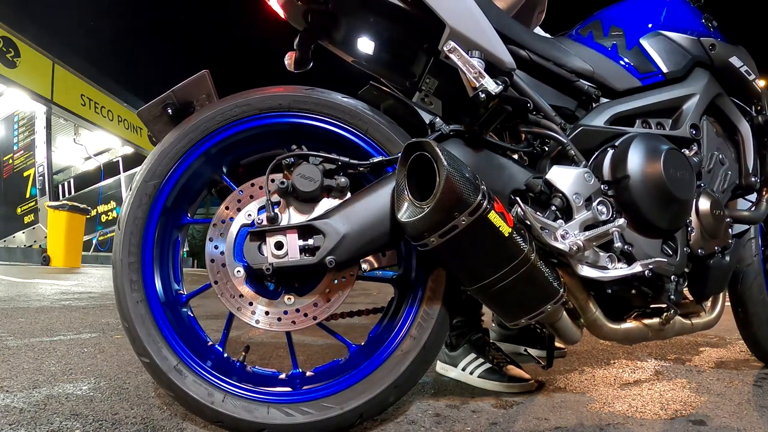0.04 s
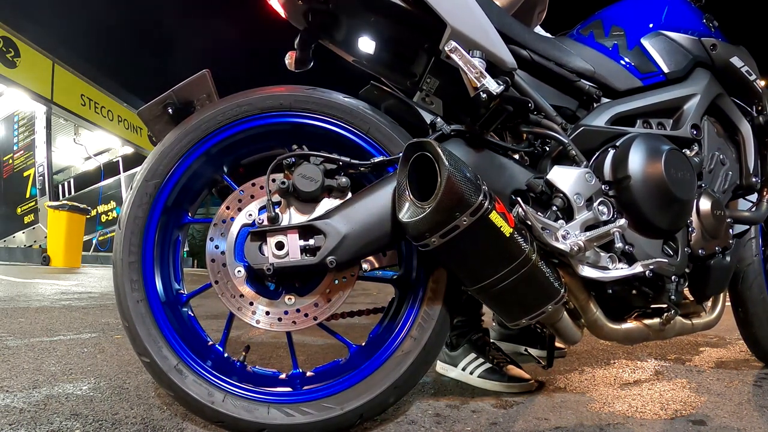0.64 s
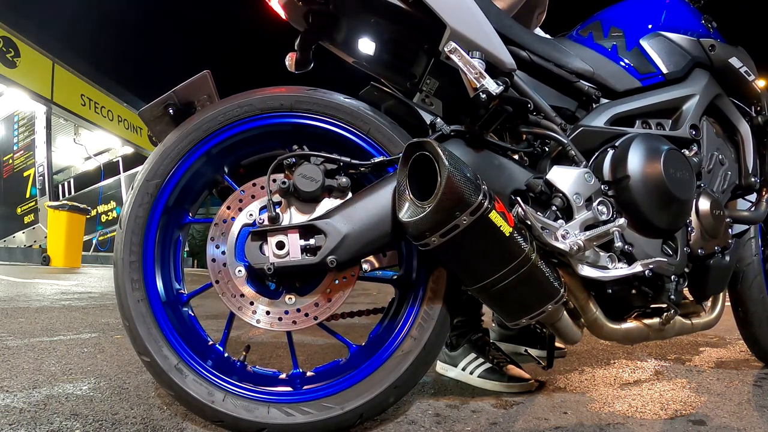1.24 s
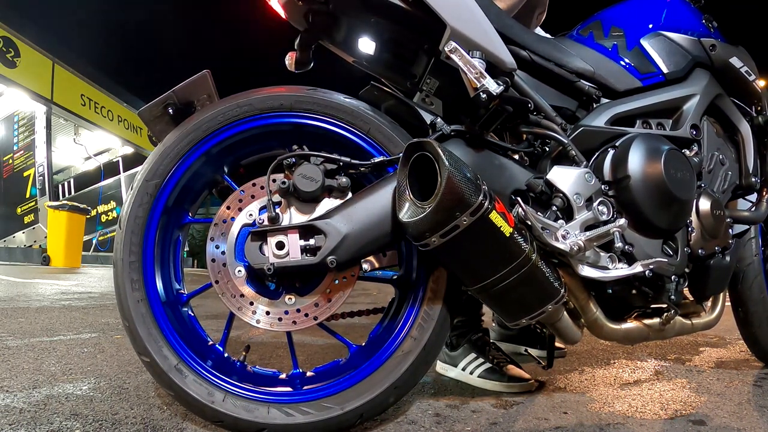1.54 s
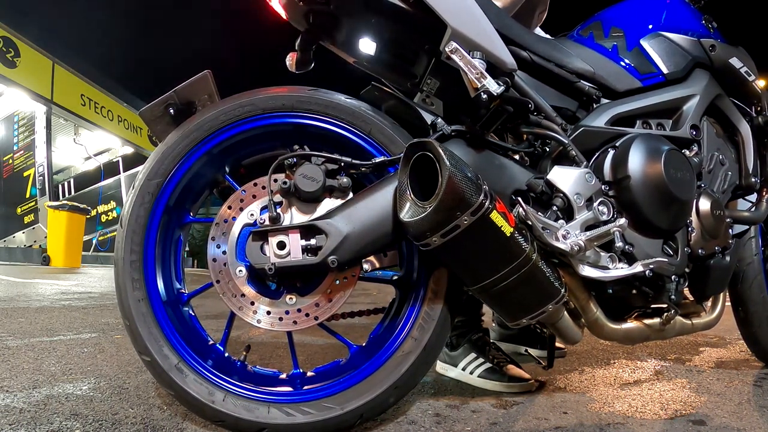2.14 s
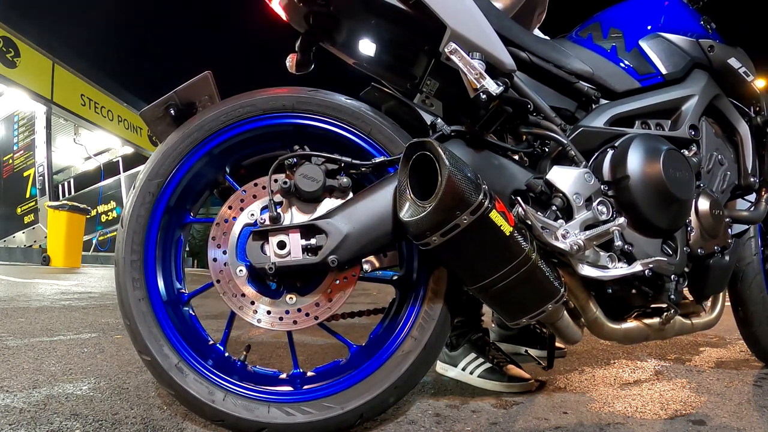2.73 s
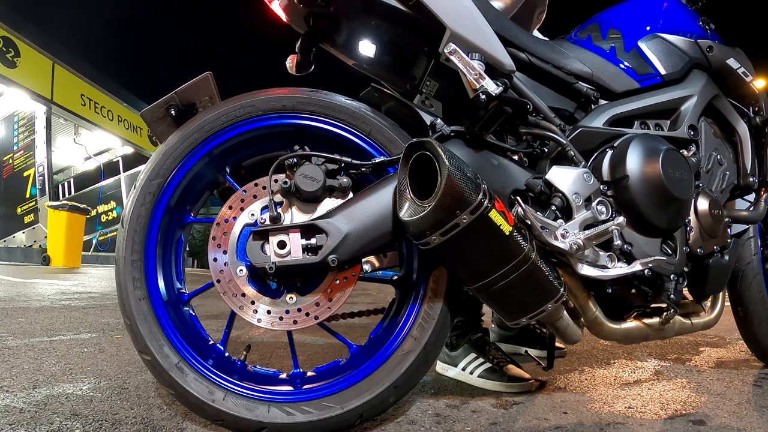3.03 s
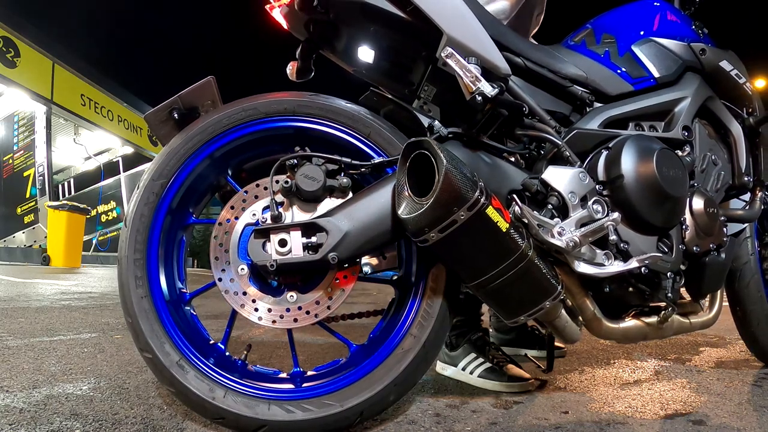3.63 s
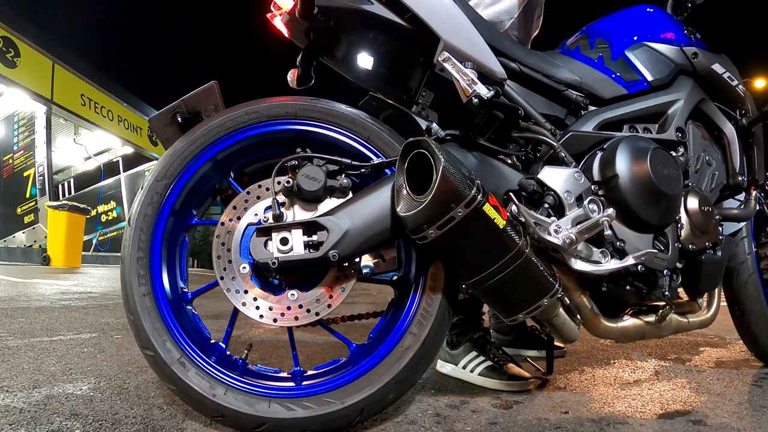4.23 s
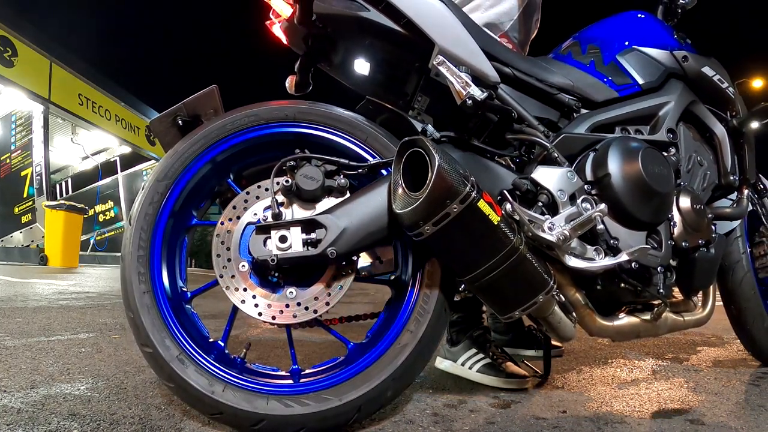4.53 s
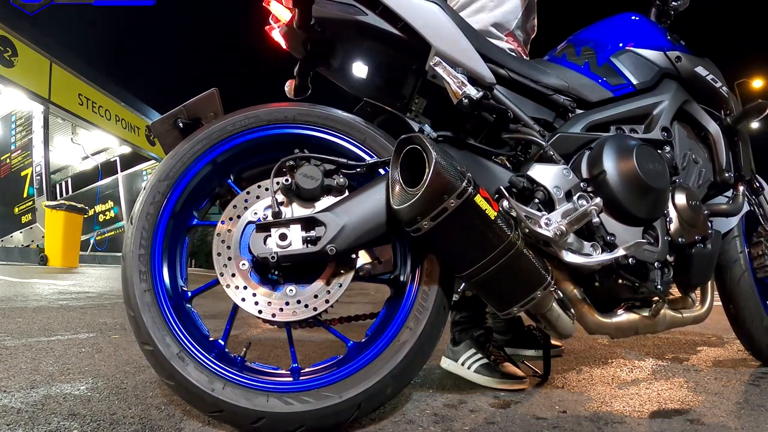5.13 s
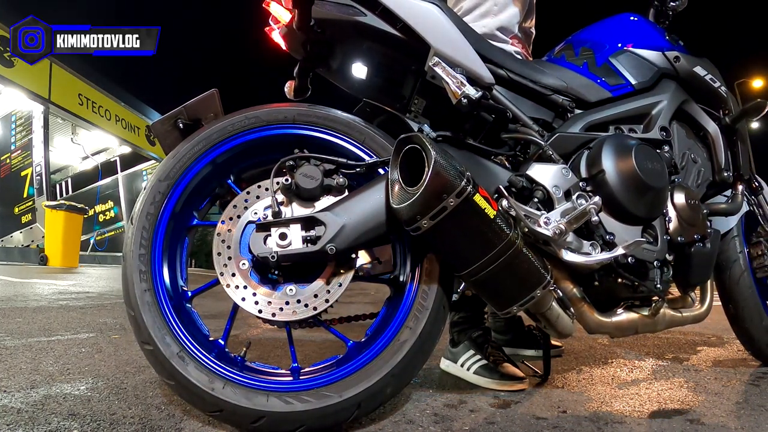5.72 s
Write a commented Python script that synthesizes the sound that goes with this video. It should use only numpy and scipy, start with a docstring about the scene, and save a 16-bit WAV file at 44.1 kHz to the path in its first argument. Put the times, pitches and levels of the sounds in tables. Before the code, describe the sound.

A motorcycle engine is revved twice, heard close behind its silencer outdoors. Each time it stumbles briefly, catches and climbs with a booming rasp, the second rev going higher. As it slows there is a faint hiss, then burbling and scattered exhaust pops. After one short spit it drops into a lumpy idle, with light valve ticking and gear whine underneath.

```python
"""Two revs of a motorcycle

A three-cylinder motorcycle is revved twice, heard close behind its silencer, then idles lumpily.
Each exhaust stroke sends a pulse down the pipe: a boom and, with open throttle, a rasping crack.
In each rev the engine stumbles, catches and pulls; then drag slows it, hissing, later burbling.
Valves rustle, gears whine, unburnt fuel pops, hot gas snaps out, and one spit comes before the idle."""
import sys
import numpy as np
from scipy import signal
from scipy.fft import rfft, irfft, next_fast_len
from scipy.io import wavfile
from scipy.ndimage import uniform_filter1d, minimum_filter1d, map_coordinates

SR = 44100
rng = np.random.default_rng(int(sys.argv[2]) if len(sys.argv) > 2 else 0)


def generate_wav(sig):
    """Save sig (samples, or channels by samples) to the path in sys.argv[1] as 16-bit PCM at SR."""
    pcm = np.round(np.clip(np.atleast_2d(sig).T, -1, 1) * 32767).astype(np.int16)
    wavfile.write(sys.argv[1], SR, pcm)


N = 258867
TIME = np.arange(N) / SR
FFT_SIZE = next_fast_len(N + SR // 2, True)
HZ = np.fft.rfftfreq(FFT_SIZE, 1 / SR)
OPEN_S, SHUT_S = 0.065, 0.019  # time the throttle takes to open and to shut
BURBLE_BELOW_HZ = 121  # a coasting engine runs raggedly below this many strokes a second


def amp(db):
    """Turns decibels into a gain."""
    return 10 ** (np.asarray(db) / 20)


def unit(x):
    """Scales x to an average strength (rms) of 1."""
    return x / np.sqrt(np.mean(x ** 2) + 1e-20)


def ramp(start, end):
    """Rises from 0 to 1 between two times."""
    return np.clip((TIME - start) / max(end - start, 1 / SR), 0, 1)


def over_pitch(points):
    """Joins (pitch_hz, value) points into a curve over all frequencies."""
    pitch_hz, values = np.transpose(points)
    return np.interp(np.log(HZ + 1), np.log(pitch_hz + 1), values)


def curves(rows, at=TIME):
    """Looks up `at` in a table's first column and gives a curve for each other column."""
    first, *others = np.transpose(rows)
    return np.array([np.interp(at, first, column) for column in others])


def wobble(per_s):
    """A smooth random curve through per_s points a second."""
    return map_coordinates(rng.standard_normal(int(N * per_s / SR) + 4), [TIME * per_s])


def filtered(x, response):
    """Passes x through a filter, given as a gain for each frequency."""
    return irfft(rfft(x, FFT_SIZE) * response, FFT_SIZE)[..., :N]


def body(colour, rings=()):
    """A filter with a broad tone colour and narrow ringing peaks on top."""
    peaks_db = sum(lift / (1 + (2 * (HZ - pitch) / width) ** 2) for pitch, width, lift in rings)
    cepstrum = irfft(np.log(amp(over_pitch(colour) + peaks_db)), FFT_SIZE)
    # folding this in half makes the ringing come after a hit, never before
    cepstrum[1:FFT_SIZE // 2] *= 2
    cepstrum[FFT_SIZE // 2 + 1:] = 0
    return np.exp(rfft(cepstrum))


def less_bass(response, below_hz=210):
    """Thins a filter's low end, as sharp pulses carry little bass."""
    return response * 1j * HZ / (below_hz + 1j * HZ)


def pulses(times, sizes=1):
    """Single clicks at exact times, even between samples."""
    at = np.asarray(times)[:, None] * SR
    taps = np.floor(at).astype(int) + np.arange(-7, 9)
    clicks = np.sinc(taps - at) * np.sinc((taps - at) / 8) * np.reshape(sizes, (-1, 1))
    return np.bincount(np.clip(taps, 0, N).ravel(), clicks.ravel(), N + 1)[:N]


def fading(clicks, life_s):
    """Gives each click a tail that dies away."""
    return np.abs(signal.lfilter([1], [1, -np.exp(-1 / (life_s * SR))], clicks))


def cycle_strength(x, phase):
    """Strength (rms) of x over the three strokes around each moment."""
    energy = np.cumsum(x ** 2)
    early, late = (np.interp(phase + step, phase, np.arange(N)).astype(int) for step in (-1.5, 1.5))
    return np.sqrt((energy[late] - energy[early]) / (late - early) + 1e-20)


# How alike left and right are (1 is identical): pitch_hz, likeness
STEREO_LIKENESS = [(700, 0.91), (2000, 0.65), (6000, 0.043)]
def stereo_noise(response):
    """Coloured noise whose two sides are less alike in the treble."""
    angle = np.arccos(over_pitch(STEREO_LIKENESS)) / 2
    shares = np.array([np.cos(angle), np.sin(angle)])
    middle, side = filtered(rng.standard_normal((2, N)), response * shares)
    return unit(np.array([middle + side, middle - side]))


# Engine speed during each rev, one list per rev: time_s, strokes_per_s
REV_SPEEDS = [
    [(.11, 61), (.16, 70), (.21, 113), (.305, 124), (.376, 188.4), (.422, 225), (.472, 243.5),
     (.516, 235.4)],
    [(1.41, 56), (1.45, 70), (1.51, 108), (1.66, 108), (1.725, 128), (1.852, 245.5), (1.92, 284),
     (1.96, 296.5)],
]
# The idle's wandering speed: time_s, strokes_per_s
IDLE_SPEEDS = [(3.1, 44.5), (3.323, 29.5), (3.495, 37.2), (3.99, 35.25), (4.43, 37.15), (4.62, 33.6),
               (4.9, 39.1), (4.93, 36), (5.6, 36.85)]
IDLE_START_S, SETTLE_S = IDLE_SPEEDS[0][0], 0.64
def engine_speed(start_hz=73.15, drag_per_s=1.41, friction_hz=17):
    """Strokes per second: drag slows the engine around each rev, until the idle takes over."""
    def coast(from_s, from_hz):
        return (from_hz + friction_hz) * np.exp(-drag_per_s * (TIME - from_s)) - friction_hz
    rate = coast(0, start_hz)
    for rev in REV_SPEEDS:
        rate = np.select([TIME < rev[0][0], TIME < rev[-1][0]], [rate, curves(rev)[0]], coast(*rev[-1]))
    return np.where(TIME < IDLE_START_S, rate, curves(IDLE_SPEEDS)[0])


# The first steady stroke of each rev and of the idle: time_s
FIRST_STROKES = [.302, 1.689, 3.104]
def stroke_phase(rate):
    """A running count of strokes, nudged to be a whole number at each first steady stroke."""
    phase = np.cumsum(rate) / SR
    counts = np.interp(FIRST_STROKES, TIME, phase)
    offsets = counts - counts[-1]
    return phase - counts[-1] - np.interp(TIME, FIRST_STROKES, offsets - np.round(offsets))


# The rider's twists of the throttle: open_s, ease_off_s, shut_s
THROTTLE_TWISTS = [(0.087, 0.403, 0.506), (1.39, 1.934, 2.004)]
def engine_state():
    """How much (0 to 1) the engine is on the throttle, coasting and idling."""
    twists = sum(ramp(opens, opens + OPEN_S) - ramp(shuts, shuts + SHUT_S)
                 for opens, _, shuts in THROTTLE_TWISTS)
    throttle = np.clip(twists, 0, 1)
    idling = ramp(IDLE_START_S - OPEN_S / 2, IDLE_START_S)
    return throttle, (1 - throttle) * (1 - idling), idling


def easing():
    """Rises from 0 to 1 as the rider eases off at the end of each rev."""
    return sum(ramp(eases, shuts) * (TIME < shuts + SHUT_S) for _, eases, shuts in THROTTLE_TWISTS)


# Exhaust loudness with the throttle open: strokes_per_s, boom_db, rasp_db
OPEN_LEVELS = [(62.3, -12.5, -39), (88.4, -13.5, -25.5), (146, -10.5, -20.5), (192, -13.5, -21.5),
               (276, -11, -18.5)]
# Exhaust loudness while coasting: strokes_per_s, boom_db, rasp_db
COAST_LEVELS = [(49.5, -19, -69), (108, -16, -45.5), (137, -11.5, -38), (179, -12, -33.5),
                (192.7, -10.5, -24), (228, -11, -24), (278, -15.5, -20)]
def exhaust_levels(rate, idle_boom_db=-16, idle_rasp_db=-67, unsettled_db=2.5, ease_drop_db=(6.5, 5.5)):
    """Boom and rasp levels follow speed and throttle; the idle booms less until it settles."""
    throttle, coasting, idling = engine_state()
    pulling_db = curves(OPEN_LEVELS, rate) - np.outer(ease_drop_db, easing())
    boom_db, rasp_db = throttle * pulling_db + coasting * curves(COAST_LEVELS, rate)
    unsettled = 1 - ramp(IDLE_START_S, IDLE_START_S + SETTLE_S)
    boom_db += idling * (idle_boom_db - unsettled_db * unsettled)
    return boom_db, rasp_db + idling * idle_rasp_db


# Firing stops as the engine stumbles or the fuel is cut: start_s, end_s
FIRING_GAPS = [(.223, .298), (.498, .511), (1.523, 1.685), (1.932, 1.970), (2.003, 2.014)]
# Missed beats of the idle: time_s, drop_db
MISSED_BEATS = [(3.178, 12.5), (3.232, 4), (3.292, 21), (4.469, 27.5), (4.582, 19), (4.698, 14),
                (4.81, 5.5), (4.94, 9), (5.435, 10)]
def strokes(rate, phase, imbalance=0.028, dead_db=-11, weak_db=-5, weak_share=.25):
    """Times and sizes of the strokes: even under load, ragged when coasting slowly, weak in the gaps."""
    stroke = np.arange(int(phase[0]), int(phase[-1]))
    time_luck, size_luck = rng.standard_normal((len(stroke), 2)).T
    cylinder = stroke % 3 - 1
    throttle, coasting, idling = (np.interp(stroke, phase, share) for share in engine_state())
    burbling = coasting * (np.interp(stroke, phase, rate) < BURBLE_BELOW_HZ)
    jitter_strokes = .005 + .007 * idling + .06 * burbling
    times = np.interp(stroke + jitter_strokes * time_luck + .005 * cylinder, phase, TIME)
    weak = rng.random(len(times)) < weak_share * burbling
    scatter_db = .41 + 2 * burbling + .6 * throttle
    level_db = weak_db * weak + scatter_db * size_luck
    for start_s, end_s in FIRING_GAPS:
        level_db[(times > start_s) & (times < end_s)] = dead_db
    for time_s, drop_db in MISSED_BEATS:
        level_db[np.argmin(np.abs(times - time_s))] -= drop_db
    return times, (1 + imbalance * cylinder) * amp(level_db)


def piston_swell(rate, phase, slow, pumping_hz=101, lurch_db=3, lag_strokes=.25, wander_strokes=.16):
    """Coasting pistons pump a round wave that grows, lurches and wanders as the engine slows."""
    lurch = amp(lurch_db * slow * wobble(35))
    wave = np.cos(2 * np.pi * (phase - lag_strokes + wander_strokes * slow * wobble(35)))
    return (pumping_hz / rate) ** 3 * 2 * rate / SR * lurch * wave


def gas_slosh(rate, times, sizes, push, pitch_hz=46):
    """A weak burn lets gas slosh back in the silencer, more so when strokes are far apart."""
    shortfall = np.maximum(.8 - sizes, 0)
    spacing = np.minimum(1, 70 / np.interp(times, TIME, rate))
    resonance = 1j * HZ * pitch_hz / (pitch_hz ** 2 - HZ ** 2 + 1j * HZ * pitch_hz)
    return filtered(push * pulses(times, shortfall * spacing), resonance ** 2)


# Tone colour of the silencer: pitch_hz, level_db
SILENCER_COLOUR = [(10, -68.5), (36, 5), (58, 11), (135, 9), (190, 11), (250, 1.5), (335, 6), (395, -18),
                   (455, -30.5), (520, -25.5), (700, -44), (3000, -110)]
def pipe(round_trip_s=0.007928, echo=0.6):
    """A pulse runs up and down the pipe and leaves through the silencer."""
    return body(SILENCER_COLOUR) / (1 - echo * np.exp(-2j * np.pi * HZ * round_trip_s))


# Lone firings while the engine stumbles: time_s, level_db (against a normal stroke), sharpness (0 to 1)
STUMBLE_BANGS = [(0.236, 0, 0.15), (.269, 1, 0.5), (.286, 1.5, 0.95), (1.533, -3.5, 0), (1.570, -0.5, 0.07),
                 (1.607, -2.5, 0), (1.635, 0.5, 0.38), (1.654, -2, 0.17), (1.672, 0, .08), (1.681, -5, .15)]
def exhaust_boom(rate, phase, times, sizes, boom_db, unfired_db=-2.5, slosh_db=1, tumble_db=-8):
    """Each stroke booms through the pipe, with less bass under load."""
    throttle, coasting, _ = engine_state()
    bang_s, bang_db, _ = np.transpose(STUMBLE_BANGS)
    slow = uniform_filter1d(1. * (rate < BURBLE_BELOW_HZ), size=900)
    swell = coasting * piston_swell(rate, phase, slow)
    push = amp(unfired_db * coasting * slow)  # unfired strokes push only weakly
    full = pipe()
    thin = less_bass(full)
    def thump(clicks):
        return filtered((1 - throttle) * clicks, full) + filtered(throttle * clicks, thin)
    boom = thump(push * pulses(times, sizes) + pulses(bang_s, amp(bang_db)) + swell)
    boom += amp(slosh_db) * np.abs(full).max() * gas_slosh(rate, times, sizes, push)
    # scaled against even strokes, so misses and bangs still stand out
    boom /= cycle_strength(thump(push * pulses(times) + swell), phase)
    # coasting slowly, gas tumbles in the pipe between the strokes
    tumble = coasting * slow * unit(filtered(rng.standard_normal(N), thin))
    return amp(boom_db) * (boom + amp(tumble_db) * tumble)


def shock_fronts(clicks, gas, turbulence, puff_s):
    """Sharp fronts, each trailed by a puff of swirling gas that swells and dies."""
    puffs = fading(fading(clicks, puff_s / 2), puff_s / 2)
    return clicks + turbulence * puffs * gas * 2 / np.sqrt(puff_s * SR / 2) ** 3


# Tone colour of the cracks with the throttle open, and with it shut: pitch_hz, level_db
BRIGHT_CRACK = [(200, -15.5), (480, 4), (1200, -1.5), (1480, -0.5), (3100, -6.5), (3700, -15),
                (6000, -27.5), (16000, -57.5)]
DULL_CRACK = [(200, -11), (480, 2.5), (1200, -6.5), (1480, -10.5), (3100, -18.5), (7000, -48), (16000, -54)]
# Ringing of the silencer's can: pitch_hz, width_hz, lift_db
CAN_RINGS = [(555, 36, 6.5), (1115, 150, 7), (1934, 360, 10), (2850, 280, 6), (3190, 110, 7),
             (4160, 270, 12), (5160, 380, 7), (6240, 340, 5.5)]
def exhaust_rasp(rate, phase, times, sizes, blunt_hz=1080, rebound=.3, rebound_s=.0009, steady_hz=220):
    """Pulses steepen into cracks in the can: blunt at low speed, bright under load, dull when coasting."""
    throttle, _, _ = engine_state()
    sharpness = np.interp(rate, [89, 138.4], [0, 1]) * (1 - .67 * easing())
    gas_colour = amp(over_pitch([(900, -14), (2500, -8), (4300, 3), (6500, 6)]))
    gas = filtered(rng.standard_normal(N), gas_colour)
    bright, dull = body(BRIGHT_CRACK, CAN_RINGS), body(DULL_CRACK, CAN_RINGS)
    blunt = bright / (1 + (HZ / blunt_hz) ** 4)
    delay_s = rebound_s * (1 + .13 * wobble(60))  # the echo off the end cap drifts with gas heat
    def ring(clicks, colour):
        echoed = clicks + rebound * np.interp(TIME - delay_s, TIME, clicks)
        return filtered(shock_fronts(echoed, gas, turbulence=.47, puff_s=.0023), colour)
    def crack(clicks, sharp_part):
        loaded = ring(sharp_part, bright) + ring(clicks - sharp_part, blunt)
        return throttle * loaded + (1 - throttle) * ring(clicks, dull)
    # cracks vary in strength until the engine pulls cleanly; weak pulses hardly steepen
    ragged = np.interp(times, TIME, throttle * np.clip(2 * (1 - rate / steady_hz), 0, 1))
    scatter_db = 2.2 * ragged * rng.standard_normal(len(times))
    fronts = pulses(times, sizes * np.minimum(sizes, 1) * amp(scatter_db))
    bang_s, bang_db, bang_sharpness = np.transpose(STUMBLE_BANGS)
    bang_sizes = amp(bang_db + 3)
    edges = sharpness * fronts + pulses(bang_s, bang_sizes * bang_sharpness)
    rasp = crack(fronts + pulses(bang_s, bang_sizes), edges)
    even = pulses(times)
    return rasp / cycle_strength(crack(even, sharpness * even), phase)


def yard_echo(sound, decay_s=0.072):
    """Sound scatters briefly off the ground, the bike and a shop front."""
    t = TIME[:SR // 4]
    tail = rng.standard_normal((2, len(t))) * amp(-60 * t / decay_s)
    return signal.fftconvolve(sound[None], tail / np.linalg.norm(tail[0]), axes=1)[:, :N]


# Tone colour of the noise in the engine casing: pitch_hz, level_db
CASING_COLOUR = [(300, -16.5), (450, -14.5), (520, -5), (640, -9), (1000, -12), (1700, -15.5),
                 (2700, -18.5), (4400, -21), (6000, -29.5), (15000, -54.5)]
# Ringing of the casing: pitch_hz, width_hz, lift_db
CASING_RINGS = [(1030, 160, 3), (1480, 48, 3.5), (2144, 310, 4.5), (3410, 430, 3), (4230, 160, 2),
                (4560, 63, 0.5), (5810, 170, 4.5)]
def valve_rustle(phase, level_db=-44, taut_db=-2, clatter=0.84, tick_s=0.0065, scatter_db=6):
    """Valves tick and the chain rustles in the casing, less when the load pulls things taut."""
    throttle, _, _ = engine_state()
    stroke = np.arange(int(phase[0]), int(phase[-1]))
    time_luck, size_luck = rng.standard_normal((len(stroke), 2)).T
    times = np.interp(stroke + 0.097 * time_luck, phase, TIME)
    ticks = fading(pulses(times, amp(scatter_db * np.minimum(size_luck, 1))), tick_s)
    noise = stereo_noise(body(CASING_COLOUR, CASING_RINGS))
    return amp(level_db + taut_db * throttle) * unit((1 + clatter * ticks) * noise)


# Tones of the gear teeth: multiple_of_tooth_rate, level_db, swell_db (once every three strokes)
GEAR_TONES = [(1, -60, 8.5), (2, -53, .5), (3, -61, 2), (4, -64, 3.5)]
# How the casing colours those tones: pitch_hz, level_db
GEAR_COLOUR = [(1100, 1), (1800, -2), (2300, -0.5), (2750, -6), (3400, -1.5), (4500, -2.5), (5500, -6),
               (8500, -36.5)]
def gear_whine(rate, phase, teeth_per_stroke=47 / 1.5, surge_rad=1.3):
    """Meshing teeth whine and rattle, fainter and more broken while the speed changes."""
    _, _, idling = engine_state()
    change_per_s = np.abs(uniform_filter1d(np.gradient(np.log(rate)), size=900)) * SR
    sweep = (1 - idling) * np.log2(1 + change_per_s)
    surge = idling * surge_rad * np.sin(2 * np.pi * phase)  # the idling crank surges with each stroke
    rattle = .55 * wobble(420) + .75 * wobble(90)
    tooth_angle = 2 * np.pi * teeth_per_stroke * phase + surge + rattle
    swell = np.cos(np.pi * (phase + .4) / 3) ** 8
    flicker_db = (2.5 + 2 * np.minimum(sweep, 1)) * np.minimum(wobble(70), 1)
    tones = sum(amp(level_db + swell_db * swell + flicker_db) * np.sqrt(2) * np.sin(multiple * tooth_angle)
                for multiple, level_db, swell_db in GEAR_TONES)
    return amp(-.5 - 1.5 * sweep) * filtered(tones, amp(over_pitch(GEAR_COLOUR)))


def machinery(rate, phase, per_octave_db=3.5, idle_lift_db=5):
    """Valves and gears together grow louder with speed and as the idle settles."""
    settled = ramp(IDLE_START_S, IDLE_START_S + SETTLE_S)
    gain = amp(per_octave_db * np.log2(rate / rate[-1]) + idle_lift_db * settled)
    return gain * (valve_rustle(phase) + gear_whine(rate, phase))


# Tone colour of air at the shut throttle: pitch_hz, level_db
AIR_COLOUR = [(2000, -60), (6000, 1), (10500, -2.5), (15500, -17)]
def throttle_hiss(rate, fast_db=-52.5, faint_db=-60.5, fast_above_hz=184, fade_hz=3.7):
    """Air hisses past the shut throttle while coasting: clearly at high speed, faintly below it."""
    _, coasting, _ = engine_state()
    fast = (1 + np.tanh((rate - fast_above_hz) / fade_hz)) / 2
    level = coasting * (amp(fast_db) * fast + amp(faint_db) * rate / fast_above_hz)
    return level * amp(1.5 * wobble(39)) * stereo_noise(body(AIR_COLOUR))


# Unburnt fuel going off in the pipe: time_s, crack_db, thump_db
FUEL_POPS = [(0.107, -25.5, -6.5), (0.939, -20, -16.5), (0.958, -27.5, -15.5), (0.977, -24, -7),
             (1.146, -24.5, -13.5), (1.167, -23, -10.5), (1.232, -23.5, -6.5), (1.37, -34, -11.5),
             (1.944, -15, -11.5), (1.949, -17, -8.5), (2.529, -23, -13), (2.539, -17, -11),
             (2.612, -11, -1.5), (2.621, -11.5, -11), (2.722, -27, -19), (2.807, -36, -14.5),
             (2.834, -30.5, -11.5), (2.864, -25.5, -10)]
def fuel_pops(sharp_lift_db=5, dull_lift_db=3, fully_sharp_db=-10, muffle_hz=1100):
    """Each pop cracks in the can and thumps through the pipe; only the strong ones are sharp."""
    times, crack_db, thump_db = np.transpose(FUEL_POPS)
    sharpness = np.minimum(amp(crack_db - fully_sharp_db), 1) ** 2
    can = body(DULL_CRACK, CAN_RINGS)
    gas = rng.standard_normal(N)
    def ring(clicks, response):
        return filtered(clicks, response / np.abs(irfft(response)).max())
    def burst(share):
        return shock_fronts(pulses(times, amp(crack_db) * share), gas, turbulence=.69, puff_s=.0038)
    sharp = amp(sharp_lift_db) * ring(burst(sharpness), can)
    dull = amp(dull_lift_db) * ring(burst(1 - sharpness), can / (1 + (HZ / muffle_hz) ** 4))
    thumps = ring(pulses(times, amp(thump_db)), less_bass(pipe()))
    return sharp + dull + thumps


def swell_and_die(start_s, rise_s):
    """A loudness curve that climbs to 1 in rise_s and then dies away."""
    age = np.maximum(TIME - start_s, 0) / rise_s
    return age * np.exp(1 - age)


# Jets of hot gas: start_s, level_db
GAS_JETS = [(0.27, -40.5), (.286, -35.5), (1.636, -43.5), (1.654, -40), (1.673, -40.5), (2.621, -39)]
# Their tone colour: pitch_hz, level_db
GAS_JET_COLOUR = [(2000, -26), (5000, 2), (9500, -11), (15500, -27)]
def gas_jets(rise_s=0.0019):
    """Hot gas snaps out of the silencer just behind the hardest bangs and pops."""
    level = sum(amp(level_db) * swell_and_die(start_s, rise_s) for start_s, level_db in GAS_JETS)
    return level * stereo_noise(body(GAS_JET_COLOUR))


# The single spit: start_s, level_db
SPIT_BURST = (3.088, -34)
# Its tone colour: pitch_hz, level_db
SPIT_TONE = [(200, -16), (900, 4), (2000, -7.5), (5000, -11.5), (16000, -45.5)]
def spit(rise_s=.011):
    """The engine spits one short burst of noise just before it idles."""
    start_s, level_db = SPIT_BURST
    return amp(level_db) * swell_and_die(start_s, rise_s) ** 2 * stereo_noise(body(SPIT_TONE))


# Balance between the two sides: pitch_hz, left_minus_right_db
BALANCE = [(90, 1.5), (280, -2.5), (550, -5.5), (1900, -1.5), (4000, -4)]
def scene(yard_db=-18, left_delay_s=.00004):
    """Mixes all the sounds, with the silencer close by and slightly to the right."""
    rate = engine_speed()
    phase = stroke_phase(rate)
    times, sizes = strokes(rate, phase)
    boom_db, rasp_db = exhaust_levels(rate)
    boom = exhaust_boom(rate, phase, times, sizes, boom_db)
    rasp = amp(rasp_db) * exhaust_rasp(rate, phase, times, sizes)
    exhaust = boom + rasp + fuel_pops() + gas_jets() + amp(yard_db) * yard_echo(rasp)
    mix = exhaust + machinery(rate, phase) + throttle_hiss(rate) + spit()
    side = np.array([[.5], [-.5]])
    delay = np.exp(-2j * np.pi * HZ * left_delay_s * side)
    return filtered(mix, amp(side * over_pitch(BALANCE)) * delay)


def record(dry, ceiling=.62, hold_s=.008, top_hz=15650):
    """A fast limiter turns the loudest peaks down, and the highest treble is cut off."""
    needed = np.minimum(1, ceiling / (np.abs(dry).max(axis=0) + 1e-9))
    span = int(hold_s * SR) + 1
    gain = uniform_filter1d(minimum_filter1d(needed, span), span)
    return filtered(dry * gain, HZ < top_hz)


dry = scene()
out = record(dry)
generate_wav(out)
```